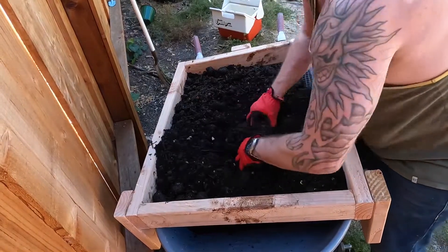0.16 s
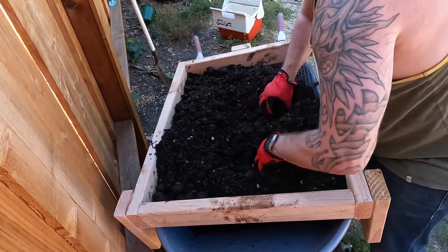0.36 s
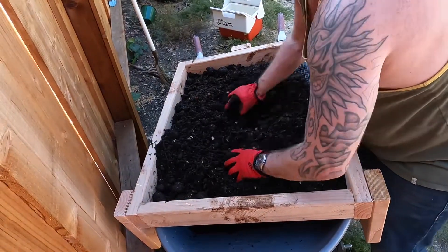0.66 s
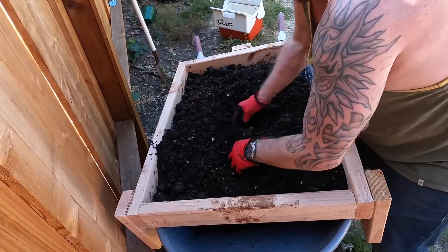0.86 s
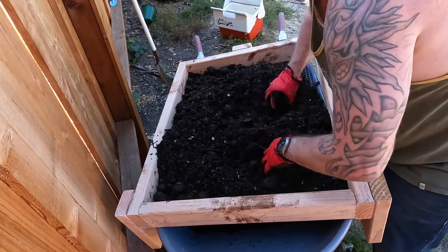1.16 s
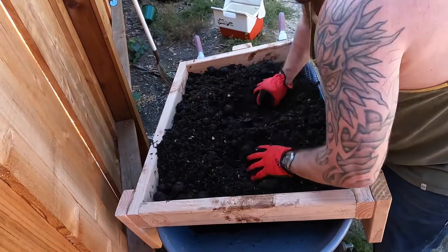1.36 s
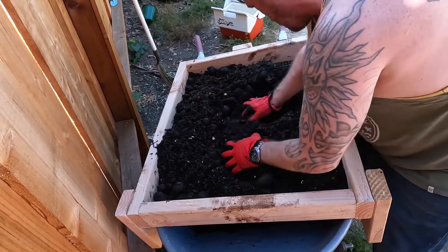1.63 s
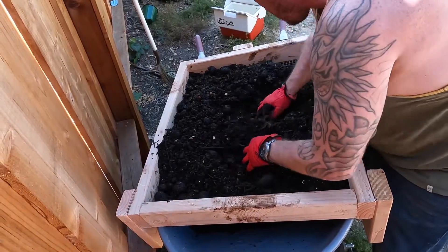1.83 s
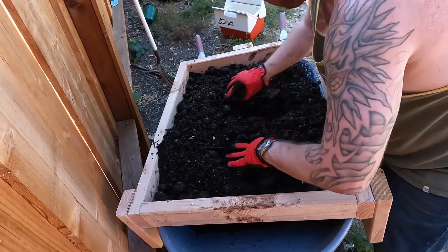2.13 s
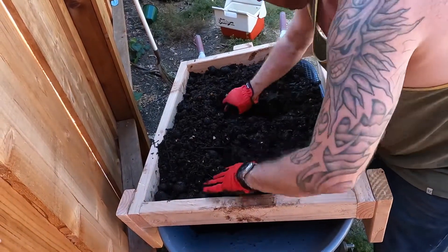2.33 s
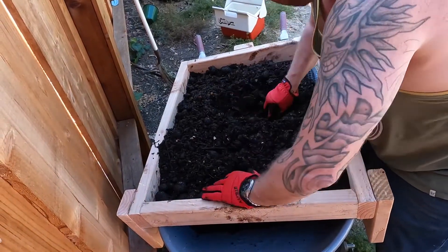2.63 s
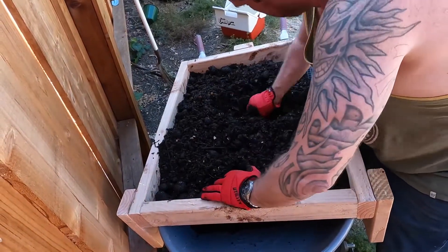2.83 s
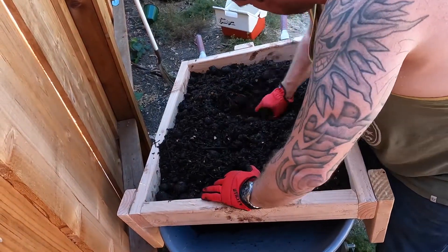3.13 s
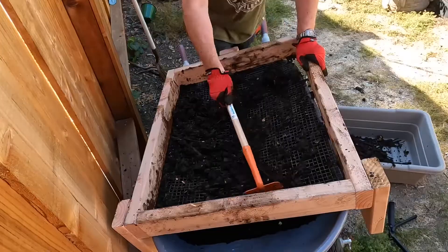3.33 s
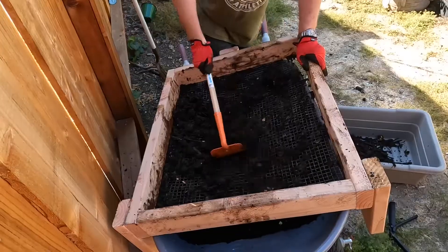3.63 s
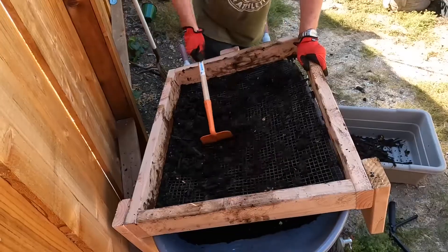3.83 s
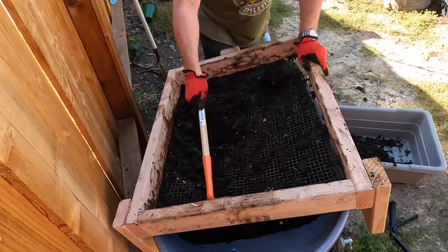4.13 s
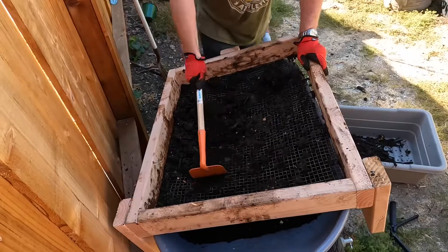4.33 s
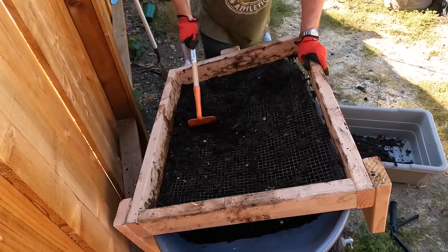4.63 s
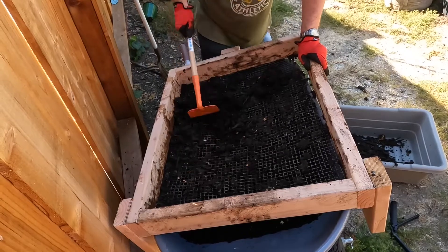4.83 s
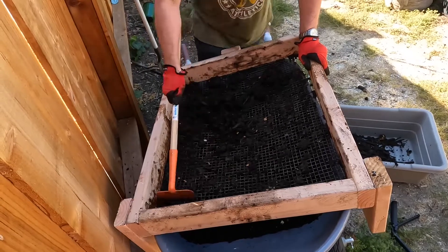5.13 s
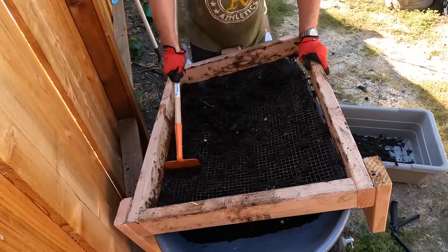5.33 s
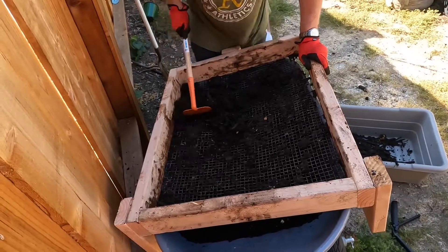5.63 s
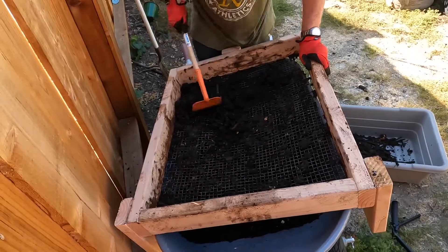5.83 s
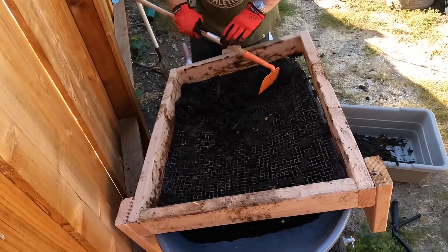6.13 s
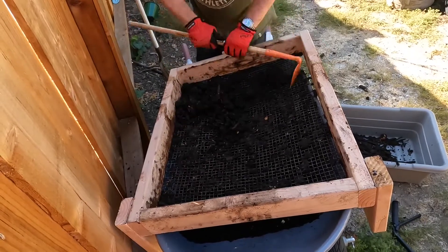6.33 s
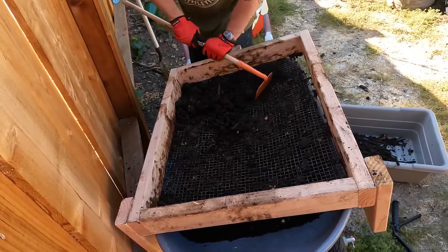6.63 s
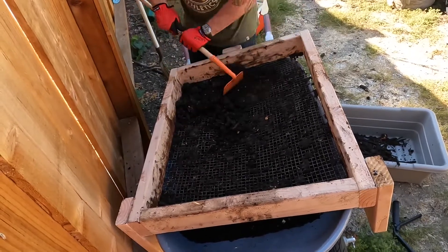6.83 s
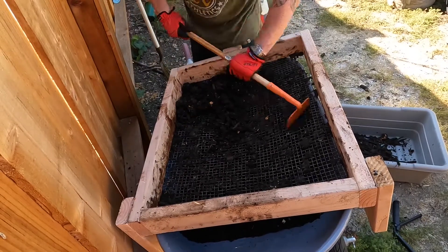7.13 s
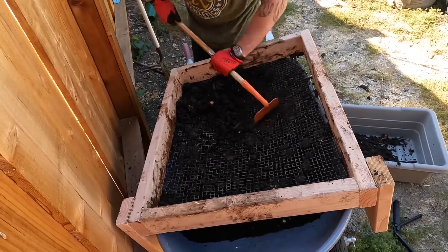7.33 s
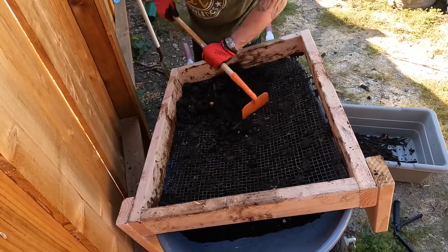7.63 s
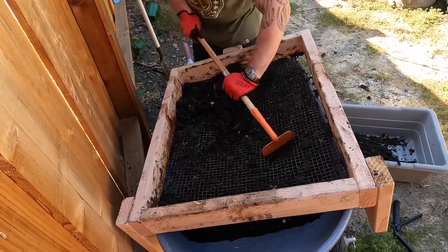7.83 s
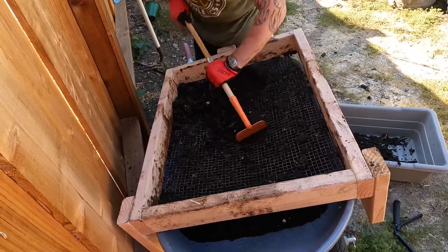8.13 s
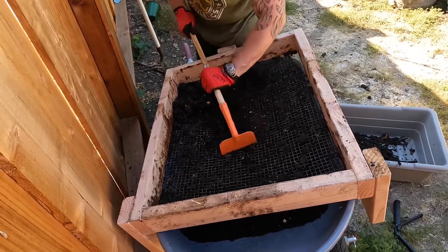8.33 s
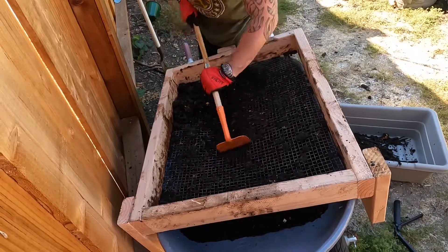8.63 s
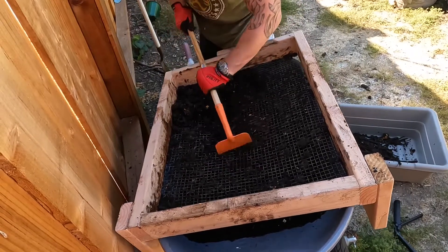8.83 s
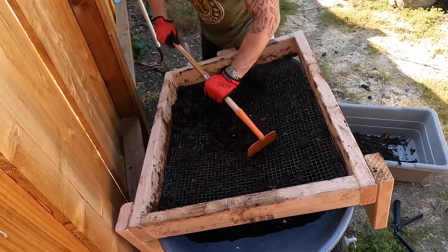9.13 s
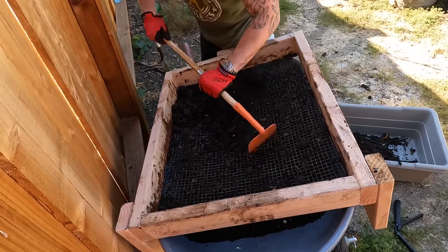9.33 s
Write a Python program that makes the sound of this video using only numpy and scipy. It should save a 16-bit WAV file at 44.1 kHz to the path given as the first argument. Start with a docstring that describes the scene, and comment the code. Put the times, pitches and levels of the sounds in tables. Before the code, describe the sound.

Crumbly compost is rubbed by gloves, followed by gritty metal hoe scrapes, rattling wires and low drumming knocks in a garden.

```python
"""Gloves rustle compost over a wire screen in a wooden frame, near the microphone, in crackling noise with soft thuds.
From 3.3 s a steel hoe chatters across the wires: each catch bursts grit noise and rings the blade's decaying modes.
Blows excite the modes of frame and screen, while a hollow body beneath drums on one low sine.
Far traffic is filtered noise; hums, a soft note and a far bird are unsteady sines in the garden.
The microphone is mono apart from its highest treble, but opens to stereo for a few seconds."""
import sys
import numpy as np
from scipy import signal
from scipy.fft import rfft, irfft, next_fast_len
from scipy.io import wavfile

SR = 44100
rng = np.random.default_rng(int(sys.argv[2]) if len(sys.argv) > 2 else 0)


def master_out(mix):
    """Clip the mix to full scale and print it as 16-bit PCM to the path in sys.argv[1]."""
    frames = np.transpose(np.atleast_2d(mix))
    ceiling = np.clip(frames, -1, 1)
    pcm = np.round(ceiling * 32767).astype(np.int16)
    wavfile.write(sys.argv[1], SR, pcm)


N = 417627
T = np.arange(N) / SR


def undb(db):
    """Decibels to an amplitude factor."""
    return 10 ** (np.asarray(db) / 20)


def track(rows, outside=None):
    """Columns of a curve table, one value per sample."""
    s, *columns = np.transpose(rows)
    return [np.interp(T, s, c, outside, outside) for c in columns]


def unit(x):
    """Scale to rms 1."""
    return x / np.sqrt(np.mean(x ** 2))


def colour(x, points):
    """Filter x by a spectrum of (Hz, dB) points; white noise of rms 1 stays at rms 1."""
    size = next_fast_len(N)
    hz, db = np.transpose(points)
    bin_hz = np.arange(size // 2 + 1) * SR / size
    gain = unit(undb(np.interp(np.log(bin_hz + 1), np.log(hz), db)))
    return irfft(rfft(x, size) * gain, size)[:N]


def walk(rate):
    """Random levels 1 / rate s apart, joined by straight lines; spread near 1."""
    points = rng.standard_normal(int(N * rate / SR) + 2)
    return 1.2 * np.interp(T * rate, np.arange(len(points)), points)


def ring(force, modes, scatter_db, rate, damped=1):
    """Force into decaying modes; the point of contact wanders, so each mode's share does too."""
    out = 0
    for k, (hz, db, t60) in enumerate(modes):
        turn = 2 * np.pi * hz / SR
        fade = np.exp(-np.log(1000) / (max(damped * t60, .005) * SR))
        push = force * undb(scatter_db * walk(rate))
        # modes move in different directions at the point of contact
        gain = (-1) ** (k // 2) * undb(db) * fade * np.sin(turn)
        out = out + signal.lfilter([0, gain], [1, -2 * fade * np.cos(turn), fade ** 2], push)
    return out


def grains(rate, spread_db):
    """Random one-sample clicks, about rate per second, with a tail of larger sizes; rms 1."""
    sizes = np.minimum(rng.exponential(size=N), 4)
    present = rng.random(N) < rate / SR
    return unit(present * rng.standard_normal(N) * undb(spread_db * sizes))


def add(into, s, burst):
    """Mix a burst in at s seconds."""
    i = int(s * SR)
    into[i:i + len(burst)] += burst[:N - i]


def tone(hz, db, waver_db):
    """A slightly unsteady sine, at rms level db before the wavering."""
    phase = 2 * np.pi * np.cumsum(hz + 0 * T) / SR
    return np.sqrt(2) * undb(db + waver_db * walk(13)) * np.sin(phase)


def scatter(x, decay_s):
    """Diffuse echoes off the boards nearby, as convolution with decaying noise."""
    echoes = rng.standard_normal(3000) * np.exp(-T[:3000] / decay_s)
    return signal.fftconvolve(x, echoes / np.sqrt(np.sum(echoes ** 2)))[:N]


RUB_FADE_DB = 19.5  # how far a rub has faded at its ends


def rubs(rows, shortest_s, longest_s):
    """Each rub swells in a rounded arc to its loudest moment and fades."""
    total = 0
    for start, peak, end, db in rows:
        if shortest_s <= end - start < longest_s:
            away = np.interp(T, [start, peak, end], [1, 0, 1], 9, 9)  # 9 is silence
            total = total + undb(db - RUB_FADE_DB * away ** 2)
    return total


# Rubs of the gloves. Each row: start, loudest moment and end in seconds, rustle level in dB.
RUBS = [(-.05, 0.062, 0.24, -63.5), (0.204, 0.218, 0.26, -55), (0.197, .5, 0.8, -62.5),
        (0.68, 0.743, 0.85, -64.5), (0.832, 0.992, 1.3, -60), (1.373, 1.398, 1.46, -54.5),
        (1.35, 1.55, 1.8, -64), (1.696, 1.87, 2.04, -61.5), (2.207, 2.426, 2.53, -63),
        (2.456, 2.57, 2.67, -60), (2.74, 2.749, 2.79, -59), (2.79, 2.942, 3.04, -56.5),
        (3.071, 3.17, 3.3, -58)]
# Clods and stones landing. Each row: start in seconds, relative thud in dB, tick relative to it in dB, tick in Hz.
CLODS = [(.069, -40, -11, 2390), (0.539, -54, 5, 2430), (0.742, -57, 5, 3650), (0.988, -51, 0, 2430),
         (1.198, -41.5, -1, 2020), (1.399, -26, -14, 2430), (1.952, -40.5, -25, 1930),
         (2.427, -46, -3, 3000), (2.551, -33, -14.5, 2350), (2.684, -44, -14, 2970),
         (2.746, -34.5, -9.5, 2300), (3.042, -42, -25, 2340), (7.559, -38, 2, 3250)]
# Spectrum of the glove rustle. Each row: frequency in Hz, relative density in dB per Hz.
CLOTH = [(1180, -14), (2000, -10.5), (2870, -9.5), (4750, -11.5), (11100, -20), (12500, -23.5),
         (15500, -21.5)]
# Modes of the wooden frame, also struck by the hoe. Each row: frequency in Hz, level in dB, t60 in seconds.
FRAME = [(48.5, 3, .1), (139.5, -1.5, 0.23), (192.7, 4, 0.092), (234.8, 0.5, 0.18), (286.9, 2, 0.087),
         (321.8, -9, 0.21), (370.2, -8, 0.13), (413, -9, 0.091)]
# Higher modes of the wood, before damping. Each row: frequency in Hz, level in dB, t60 in seconds.
WOOD = [(550, 9.5, 0.06), (616, 0.5, 0.17), (784, -1.5, 0.092), (912.5, 7.5, 0.068), (1408, -1.5, 0.05),
        (1700, -8.5, 0.033), (2230, -9, 0.058)]
# Spectrum of a blow on wood. Each row: frequency in Hz, relative density in dB per Hz.
CRACK = [(200, -18), (500, 1.5), (1200, -7.5), (2200, -1.5), (3200, -25), (8000, -48.5)]


def gloves():
    """Fine crackling rustle, with soft thuds on the frame and small stone ticks."""
    brief, long = rubs(RUBS, 0, .12), rubs(RUBS, .12, 1)
    rustle = undb(1.2 * walk(25)) * colour(grains(8200, 1.5), CLOTH)
    duller = signal.lfilter(*signal.butter(1, 5000, fs=SR), rustle)
    out = brief * rustle + long * duller  # slow rubs are duller
    thud, t = np.zeros(N), T[:1500]
    for (s, db, tick_db, hz), noise in zip(CLODS, rng.standard_normal((len(CLODS), len(t)))):
        add(thud, s, 0.75 * undb(db) * np.hanning(30) / 15)
        tick = (np.sin(2 * np.pi * hz * t) + .1 * noise) * np.exp(-t / .007)
        add(out, s, .8 * undb(db + tick_db) * tick)
    crumble = signal.lfilter([1], [1, -np.exp(-1 / (0.013 * SR))], thud)  # 13 ms decay
    out += colour(crumble * 0.32 * rng.standard_normal(N), CRACK)
    return out + ring(thud, FRAME[1:], 0.84, 2.83) + ring(0.16 * thud, WOOD, 1.2, 10, damped=.5)


# Spectrum of the far traffic. Each row: frequency in Hz, relative density in dB per Hz.
TRAFFIC = [(4.7, -18.5), (8.0, -41), (33, 3), (95, -2), (126, -4.5), (147, -7.5), (184, -7), (369, -21),
           (841, -22), (1120, -23.5), (2250, -39.5), (4650, -57), (10900, -67), (12400, -62),
           (15500, -69.5)]
# Traffic level before its random swells, dropping at 3.3 s. Each row: time in seconds, level in dB.
TRAFFIC_DB = [(0, -38.5), (1, -39), (1.7, -38.5), (2.3, -40), (3.27, -38), (3.305, -54), (3.34, -49),
              (4.1, -48.5), (5, -43.5), (6, -46), (7, -39.5), (8.3, -39.5), (9.47, -38)]
# Hums in the garden. Each row: frequency in Hz, then a curve of time in seconds and level in dB.
HUMS = [(120, [(.55, -62), (.8, -46), (2.7, -45.5), (3.25, -50), (3.3, -78)]), (135.4, [(5.7, -64.5),
        (6.2, -35.5), (6.7, -35), (6.9, -47), (7.3, -39), (7.9, -43.5), (8.2, -69.5)]), (243, [(6.6, -50),
        (6.8, -49.5), (7.3, -49.5), (7.6, -68)])]
# A short soft note far off: frequency in Hz, then a curve of time in seconds and level in dB.
NOTE = (612, [(3.02, -80), (3.06, -56), (3.1, -56), (3.14, -80)])


def garden():
    """Far traffic as noise that swells a little, and hums and a note as sines that come and go."""
    traffic = unit(colour(rng.standard_normal(N), TRAFFIC))
    out = undb(track(TRAFFIC_DB)[0] + walk(3.2)) * traffic
    return out + sum(tone(hz, track(rows, -120)[0], 2.0) for hz, rows in HUMS + [NOTE])


# Level of a shudder below hearing. Each row: time in seconds, level in dB.
SWAY = [(1.3, -50), (1.6, -35.5), (2.03, -34.5), (2.12, -29.5), (3.56, -28.5), (3.64, -50.5), (3.82, -45.5),
        (3.92, -30), (4.05, -46.5), (4.25, -41), (4.4, -55.5)]
# Its pitch. Each row: time in seconds, frequency in Hz.
SWAY_HZ = [(1.3, 15), (2.1, 16.2), (3.2, 20.4), (3.5, 18), (4.4, 13.3)]


def shudder():
    """A gliding sine below hearing."""
    return tone(track(SWAY_HZ)[0], track(SWAY, -120)[0], 1)


CUT_S, CUT_FADE_S = 3.31, .02


def after_cut():
    """Quick fade-in after the cut from gloves to hoe."""
    return np.clip((T - CUT_S) / CUT_FADE_S, 0, 1)


# Modes of the hoe blade: frequencies in Hz.
BLADE_HZ = [818, 910, 1845, 2385, 2625, 2955, 3657, 4490, 4760, 4975, 5200, 5440, 5556, 5860, 6860, 7280,
            8550, 9040, 9980]
# For each of those modes, before damping. Each row: level in dB, t60 in seconds.
BLADE = [(4, 0.066), (-0.5, 0.076), (-1, 0.22), (2, 0.096), (9, 0.04), (-18, 0.023), (-3.5, 0.15),
         (-10, 0.12), (-12, 0.027), (-7, 0.17), (-5.5, 0.043), (-6.5, 0.12), (-5, 0.061), (-9, 0.12),
         (-19, 0.051), (-17, 0.14), (-22, .06), (-14.5, .06), (-18, 0.047)]
# The hoe catching on wires. Each row: start in seconds, relative grit level in dB, blade ring relative to it
# in dB, brightness in dB, clink in dB.
CATCHES = [(3.344, -19, -2.5, 3.5, 7), (3.391, -17, 0, 0, 1), (3.42, -16.5, -2.5, 10, 2),
           (3.44, -24.5, 0.5, 16, 2), (3.475, -14.5, -9, 0, -9), (3.505, -13.5, -0.5, 8, -3),
           (3.5386, -8.5, -3.5, 17, -9), (3.5594, -12.5, 6.5, 4.5, -7), (3.597, -14, -4, 17, 0),
           (3.6182, -14.5, 12, 1, -11), (3.653, -22.5, -1.5, 4.5, -1), (3.6756, -19.5, 10.5, 0, -7),
           (3.7013, -10.5, 2, 3.5, -19), (3.7732, -15, 5.5, 1.5, -7), (3.818, -23.5, 0, 3.5, -10),
           (3.8507, -24.5, 1, 4, 0), (3.8846, -35.5, 10.5, -3, -9.5), (4.1987, -32, -0.5, -7, -12),
           (4.2115, -26.5, -7, -7, 3), (4.2681, -34, -5, -9, 2), (4.2994, -17, -4.5, -7, -8),
           (4.337, -23.5, -5, -4, -5), (4.3506, -13.5, -4.5, -2.5, -2), (4.399, -28.5, 3, -9, -2),
           (4.4294, -19.5, 2.5, 1, 2), (4.4783, -18.5, -3, 3, 4), (4.4966, -20, -4.5, -4, 7),
           (4.558, -37.5, -2, -11, -4), (4.6468, -36.5, -4, -9, -5), (4.7229, -36, 3, -5, -18.5),
           (5.1491, -30.5, -6, 4.5, 10.5), (5.21, -34, -7.5, -1, 7), (5.2385, -24, -0.5, -5, 7.5),
           (5.2812, -23, -2.5, 0, 7), (5.3116, -18.5, 1, -2, 5), (5.351, -14.5, -4, -5, -5),
           (5.416, -22.5, 3.5, 6.5, 2.5), (5.44, -28.5, 4, -3, 8), (5.501, -26.5, 3.5, -6.5, -7),
           (5.563, -29, 0, 0, -14.5), (5.5819, -21.5, -5, 6.5, -11), (5.6679, -36, -2, 8, -1),
           (5.6834, -26.5, -7.5, -1.5, 15.5), (5.7183, -34, -7, -6, 2), (5.759, -40, 0.5, -1, -1.5),
           (6.424, -30, -9, 6, -2), (6.439, -28.5, -2.5, 1.5, 0.5), (6.498, -34, -2, -4, 0),
           (6.6028, -30.5, -13, 12, 4), (6.732, -54, -1.5, -7, -4), (7.083, -43, -9, 6, -6),
           (7.273, -50, 5, 23, 2), (7.3104, -33, 11, 1.5, 3), (7.4011, -32, 2, 15, 4),
           (7.4325, -34.5, 4.5, 24, 2), (7.5616, -38, -6, -11, 14), (7.8155, -33, 3, -6.5, -5.5),
           (7.8339, -23.5, -3.5, 14, 11), (7.868, -49, -9, -3, -2), (7.8859, -26, 1, 11, -10),
           (7.925, -21, -4, 9, 5), (7.9655, -12, -4, -10, 2.5), (7.989, -23, -5, -9, 6),
           (8.053, -27.5, -8, -8, 12), (8.1274, -25.5, 0, -6.5, -1), (8.4571, -24, -9, 4, 3),
           (8.498, -27.5, -4.5, -1, 7), (8.52, -13.5, -3, -3.5, 3), (8.553, -22.5, -3, 12, 7),
           (8.5691, -17.5, 0.5, 0, -6), (8.846, -31, -3, -3, -6), (8.8735, -38, 4, -19.5, -7),
           (9.0486, -31.5, 0.5, 1.5, 0.5), (9.207, -44, -1, 8, -1), (9.2334, -38, -3, -8, -1),
           (9.318, -39.5, 0, 4, 0)]
CRUNCH_MS, FREE_MS = 5.5, 12  # base decay of the crushed grit; base time until the compost damps the blade
CRUNCH_MS_PER_RING_DB, FREE_MS_PER_RING_DB = 0.02, 1  # change of those times per dB of blade ring
DETUNE = 0.0044  # random spread of each blade mode's pitch from catch to catch, as a share of its frequency
SOFTEN_PER_DB = 0.2  # catches below -19 dB bite in and fade more slowly: growth per dB


def catches():
    """Each catch crushes grit and lets the blade ring freely until it bites into the compost again."""
    dull, bright, steel = np.zeros((3, N))
    t, hz = T[:2600], np.array(BLADE_HZ)
    mode_db, t60 = np.array(BLADE).T[:, :, None]
    decay = np.log(1000) * t / np.maximum(t60, .01)
    modes = undb(mode_db) * np.exp(2j * np.pi * hz[:, None] * t - decay)
    # brightness shifts weight from the low modes to the upper cluster
    octaves = np.clip(np.log2(hz / 3300), -.9, .7)
    clink = (hz > 2200) & (hz < 3000)  # modes that a glancing blow favours
    gaps = np.diff(np.array(CATCHES)[:, 0], append=N / SR)  # the next catch stops the ringing
    noise = rng.standard_normal((len(CATCHES), len(t) + 2 * len(hz)))
    for (s, db, ring_db, tilt_db, clink_db), chance, gap_s in zip(CATCHES, noise, gaps):
        crunch_ms = max(CRUNCH_MS + ring_db * CRUNCH_MS_PER_RING_DB, 2)
        free_ms = max(FREE_MS + ring_db * FREE_MS_PER_RING_DB, 2)
        soft = 1 + SOFTEN_PER_DB * max(-19 - db, 0)
        envelope = np.exp(-t * 1000 / crunch_ms / soft) * (1 - np.exp(-t / (0.0009 * soft ** 2)))
        crunch = 0.28 * undb(db) * chance[:len(t)] * envelope
        add(dull, s, crunch * undb(-tilt_db / 2))
        add(bright, s, crunch * undb(tilt_db / 2))
        share = undb(tilt_db * octaves + clink_db * clink + 3.5 * chance[-len(hz):])
        phase = np.exp(2j * np.pi * chance[len(t):len(t) + len(hz)])
        detuning = np.exp(2j * np.pi * DETUNE * (hz * chance[:len(hz)])[:, None] * t)
        free = np.exp(-np.maximum(t - free_ms / 1000, 0) / 0.008 - np.maximum(t - gap_s, 0) / .004)
        free = free * (1 - np.exp(-t / (0.00045 * soft ** 2)))
        add(steel, s, .11 * undb(db + ring_db) * free * ((share * phase) @ (modes * detuning)).imag)
    split = signal.butter(1, 3300, fs=SR, output="sos")
    # dull below 3300 Hz, bright above it
    return signal.sosfilt(split, dull - bright) + bright, steel


# Hoe strokes. Each row: start and end in seconds, relative grit level at start and at end in dB, then
# frame rumble, blade ring and edge sizzle relative to the grit in dB.
STROKES = [(3.333, 3.6, -45, -39, 11.6, 0, -21), (3.597, 3.726, -40.5, -47, 21.2, -1, -13),
           (3.78, 3.912, -54.5, -57, 21.4, 10, -26), (4.266, 4.48, -47, -44, 14.5, 10, -19),
           (4.525, 4.762, -55, -56.5, 16, 3, -28.5), (5.144, 5.168, -49.5, -51.5, 18.3, 0, -18),
           (5.213, 5.44, -50, -39.5, 16.5, 0, -20), (5.448, 5.6, -51.5, -42.5, 14, 4, -18),
           (5.612, 5.726, -39, -57.5, 16, 6.5, -20), (6.1, 6.4, -62, -69, 14.4, -2.5, -18),
           (6.476, 6.672, -58, -45.5, 11.6, 2, -16), (6.649, 6.841, -41, -58.5, 4.8, 5, -24),
           (6.85, 7.087, -68, -61.5, 19.7, -1, -13), (7.069, 7.27, -51, -46, 8, -3, -16),
           (7.271, 7.45, -43.5, -35.5, 8.5, 3, -11.5), (7.816, 7.988, -48, -36, 15.7, 3.5, -12),
           (7.994, 8.173, -44, -53, 20.6, 5, -17), (8.203, 8.456, -67, -68.5, 26.2, -2, -16.5),
           (8.462, 8.583, -52, -36, 19, 4, -11.5), (8.6, 8.8, -56.5, -64.5, 24.8, 3.5, -23),
           (8.797, 8.85, -59.5, -39.5, 19, -6, -22), (8.859, 8.909, -48.5, -53.5, 32.8, -7, -24),
           (9.06, 9.106, -48, -59, 17, -4, -26)]
ATTACK_S, RELEASE_DB_PER_S = 0.013, 351.5  # the attack leads up to the start
TRICKLE_DB, TRICKLE_RUMBLE_DB = -74.5, -47.5  # loose crumbs and a faintly shaking frame between strokes
SKID_DB, SKID_S = -20.5, 0.011  # after a catch the blade skids on: level relative to the catch, decay time


def strokes():
    """Pressure of the blade over each stroke, as gains for grit, frame rumble, blade ring and edge sizzle."""
    trickle = undb([TRICKLE_DB, TRICKLE_RUMBLE_DB, TRICKLE_DB, TRICKLE_DB - 18.5])
    gains = np.outer(trickle, after_cut())
    for start, end, start_db, end_db, *relative_db in STROKES:
        db = np.interp(T, [start, end], [start_db, end_db]) - RELEASE_DB_PER_S * np.maximum(T - end, 0)
        push = undb(db) * np.clip((T - start) / ATTACK_S + 1, 0, 1) ** 2
        gains = np.maximum(gains, np.outer(undb([0, *relative_db]), push))
    skid, t = np.zeros(N), T[:6000]
    for s, db, *_ in CATCHES:
        add(skid, s - .003, undb(db + SKID_DB) * np.exp(-t / SKID_S) * (1 - np.exp(-t / 0.0061)))
    grit, rumble, blade, edge = gains
    # ring and sizzle as ratios to the grit
    return grit + skid, rumble, blade / grit.clip(1e-9), edge / grit.clip(1e-9)


# The hoe thumping the frame. Each row: start in seconds, relative thud in dB, then wood knock and
# screen boom relative to it in dB.
KNOCKS = [(3.347, -35.5, -17, 7), (3.385, -29, -7, 0.5), (3.477, -28.5, 0, 1.5), (3.506, -30, 2, -15),
          (3.553, -15.5, -13, -5.5), (3.613, -16, -2, -11.5), (3.663, -24, 4, -7), (3.7, -25.5, -8, 6.5),
          (3.771, -31.5, -9, 1), (3.819, -28.5, -11, -2), (3.871, -23, -9.5, -2.5), (4.218, -25, -6, -9.5),
          (4.292, -36, -3, -12.5), (4.354, -31.5, -1, -21.5), (4.398, -32.5, -16, 3.5),
          (4.419, -10, -10.5, -11), (4.431, -14, -8, -11), (4.492, -19.5, -6.5, -10),
          (5.154, -29.5, -5, -8), (5.238, -33, -7, -10), (5.283, -20.5, -4, -18.5), (5.308, -33.5, 5, 10),
          (5.358, -8, -6.5, -10), (5.372, -9.5, -3.5, -16), (5.426, -13, -5, -31.5),
          (5.444, -20.5, -2, -11), (5.596, -28.5, -9, -12.5), (6.438, -27.5, -11.5, -13.5),
          (6.764, -27.5, -18, -21), (7.289, -30, -20.5, -19), (7.343, -18.5, -18, -21),
          (7.831, -40.5, 7, -8.5), (7.869, -21.5, -5, -24.5), (7.928, -19, -5, -19),
          (7.966, -19.5, -8, -21), (7.998, -24.5, -3, 2.5), (8.053, -12, -20.5, -25),
          (8.073, -23, -24, -5.5), (8.131, -28.5, -11.5, -16), (8.452, -24, -11, -9.5),
          (8.522, -16.5, -13, -30.5), (8.572, -25, -11.5, -14), (8.847, -13.5, -22, -12.5),
          (8.876, -7.5, -8.5, -27), (9.038, -34, -16, -5)]
# Spectrum of crushed grit. Each row: frequency in Hz, relative density in dB per Hz.
GRIT = [(470, -21), (800, -4.5), (1500, -2.5), (2500, -8), (3200, -7), (4000, -13.5), (5500, -15.5),
        (6500, -20.5), (7300, -23.5), (8800, -18.5), (10600, -32), (12400, -25), (14000, -50),
        (15500, -53.5)]
# Modes of the thin blade edge. Each row: frequency in Hz, level in dB, t60 in seconds.
EDGE = [(11300, -32, .02), (12000, -24, .02), (12600, -18, .02), (13300, -34, .02)]
# Modes of the wire screen. Each row: frequency in Hz, level in dB, t60 in seconds.
SCREEN = [(101.15, 4.5, 0.63), (116.6, 4, 0.66)]


def hoe():
    """Blade, grit, frame and screen, driven by catches, knocks and the drag between; returns (treble, bass)."""
    grit, steel = catches()
    knock, thud, boom = np.zeros((3, N))
    t = T[:900]
    for (s, db, knock_db, boom_db), noise in zip(KNOCKS, rng.standard_normal((len(KNOCKS), len(t)))):
        add(thud, s, 0.33 * undb(db) * np.hanning(64) / 32)  # the compost cushions the blow
        add(boom, s, 0.87 * undb(db + boom_db) * np.hanning(100) / 50)
        add(knock, s, 0.028 * undb(db + knock_db) * (noise + 8 * (t == 0)) * np.exp(-t / 0.0013))
    drag, rumble, ringing, sizzle = strokes()
    uneven = undb(3.05 * walk(40))
    slips = drag * uneven * grains(6000, 0.67)
    # pressed into the compost, the blade rings only briefly
    steel += ring(.012 * ringing * slips, np.c_[BLADE_HZ, BLADE], 4, 30, damped=.22)
    steel += ring(.5 * sizzle * (slips + grit), EDGE, 1.5, 40)
    shaking = 0.018 * rumble * uneven * rng.standard_normal(N)
    wood = ring(knock + 0.17 * shaking, WOOD, 3.3, 30, damped=0.68) + colour(9 * knock, CRACK)
    treble = colour(grit + 0.73 * slips, GRIT) + steel + wood
    bass = ring(thud + shaking, FRAME, 2.2, 17) + ring(boom + 0.34 * shaking, SCREEN, 0.49, 4.5)
    return treble, bass


# Pushes that set the hollow body drumming. Each row: time in seconds, level in dB, seconds until the hoe
# presses it quiet.
DRUM = [(3.33, -26, 0.16), (3.58, -22.5, .1), (3.69, -17, 0.082), (3.83, -19, 0.051), (3.97, -21.5, .3),
        (4.28, -22.5, .15), (4.49, -12.5, .8), (5.21, -21, .15), (5.35, -15.5, 0.11), (5.49, -11.5, 1.0),
        (6.5, -32, 0.041), (7.89, -25.5, 0.014), (8.03, -25.5, 0.062), (8.122, -25, .6), (8.72, -32.5, .1),
        (8.85, -33, 0.13), (9.099, -43, 0.26)]
DRUM_HZ, DRUM_IDLE_DB = 83.6, -53
DRUM_RISE_DB_PER_S, DRUM_RING_DB_PER_S, DRUM_PRESSED_DB_PER_S = 200, 31.5, 206


def hollow_drum():
    """One low sine; each push rises quickly, rings down slowly, and dies fast once pressed."""
    level = DRUM_IDLE_DB
    for s, db, free_s in DRUM:
        after = np.maximum(T - s, 0)
        fall = DRUM_RING_DB_PER_S * after + DRUM_PRESSED_DB_PER_S * np.maximum(after - free_s, 0)
        level = np.maximum(level, db - DRUM_RISE_DB_PER_S * np.maximum(s - T, 0) - fall)
    return after_cut() * tone(DRUM_HZ, level, 0.19)


# Calls of a far bird. Each row: start and end in seconds, start and end pitch in Hz, peak level in dB.
CHIRPS = [(3.97, 4.103, 3730, 4140, -77.5), (8.349, 8.47, 4100, 4150, -75)]
WARBLE_HZ, WARBLE_RATE = 200, 250  # depth and speed (per s) of the random quaver


def bird():
    """Faint rising whistles that quaver and swell in a half-sine arc."""
    out = 0
    for start, end, start_hz, end_hz, db in CHIRPS:
        arc = np.sin(np.pi * np.clip((T - start) / (end - start), 0, 1)).clip(0, 1)
        hz = np.interp(T, [start, end], [start_hz, end_hz]) + WARBLE_HZ * walk(WARBLE_RATE)
        out = out + arc * tone(hz, db, 2.7)
    return out


# Opening of the stereo image. Each row: time in seconds, share of the side signal kept.
WIDTH = [(1.38, 0), (2.2, 0.55), (3.3, 0.95), (3.9, 0.83), (4.3, 0.074), (4.8, 0.017), (4.82, 0)]


def scene():
    """Mix every source to left and right through a mid and a side signal."""
    rest = gloves() + garden() + bird()
    sway = shudder()
    treble, bass = hoe()
    treble = treble + 0.17 * scatter(treble, 0.02)
    drum = hollow_drum()
    # echoes differ between the two ports; the low shaking reaches the right one more
    side = scatter(0.34 * treble + .1 * bass + 0.16 * rest, .008)
    side -= .42 * drum + .35 * sway + .5 * bass
    # the highest treble stays stereo throughout, flickering and mostly louder on the left
    top = signal.sosfilt(signal.butter(8, 11500, "high", fs=SR, output="sos"), treble + rest)
    side = track(WIDTH)[0] * side + (.5 + .7 * walk(400)) * top
    mid = treble + bass + drum + sway + rest
    return np.array([mid + side, mid - side])


TOP_HZ = 15550


def record(dry):
    """The camera microphone rounds the loudest peaks and cuts the top."""
    rounded = .9 * np.tanh(dry / .9)
    return signal.sosfilt(signal.ellip(10, .2, 80, TOP_HZ, fs=SR, output="sos"), rounded)


dry = scene()
out = record(dry)
master_out(out)
```